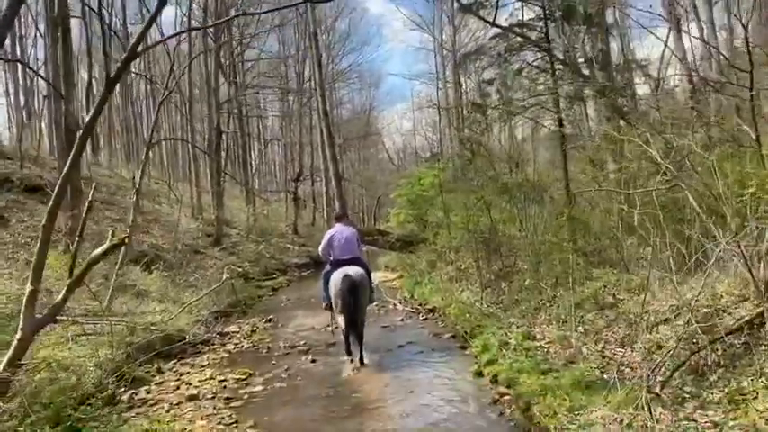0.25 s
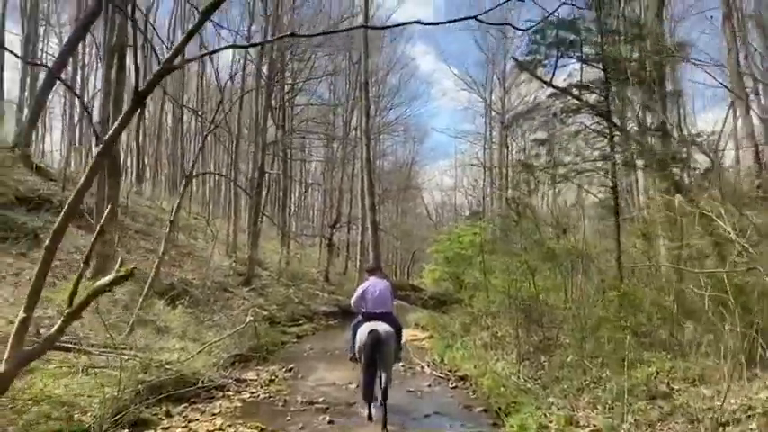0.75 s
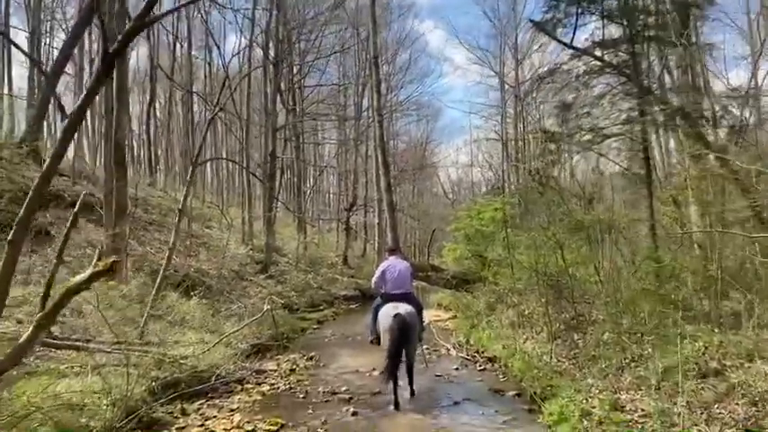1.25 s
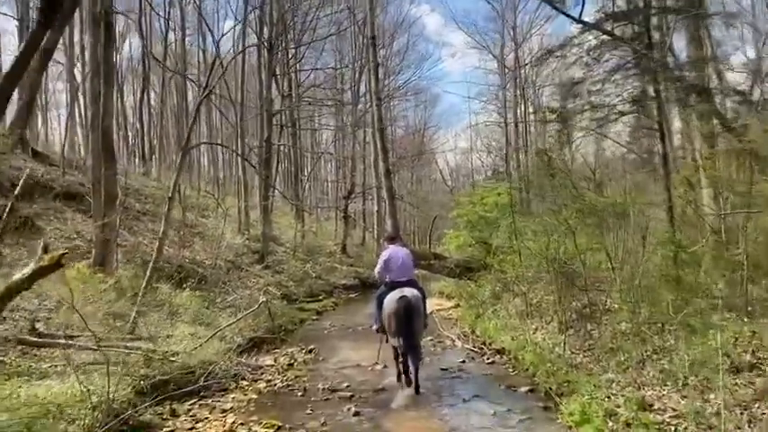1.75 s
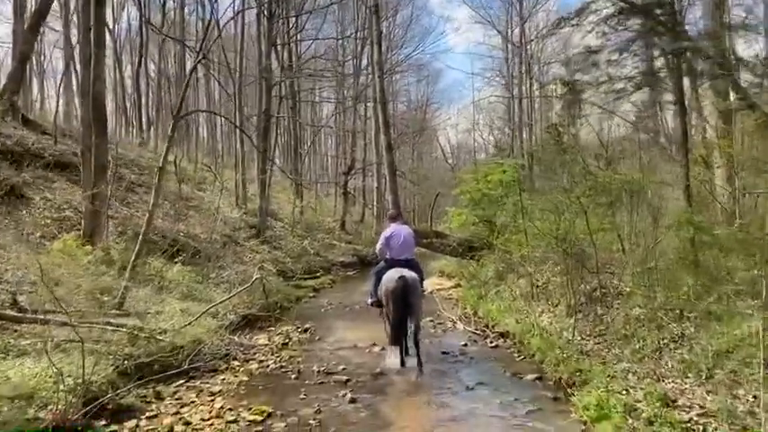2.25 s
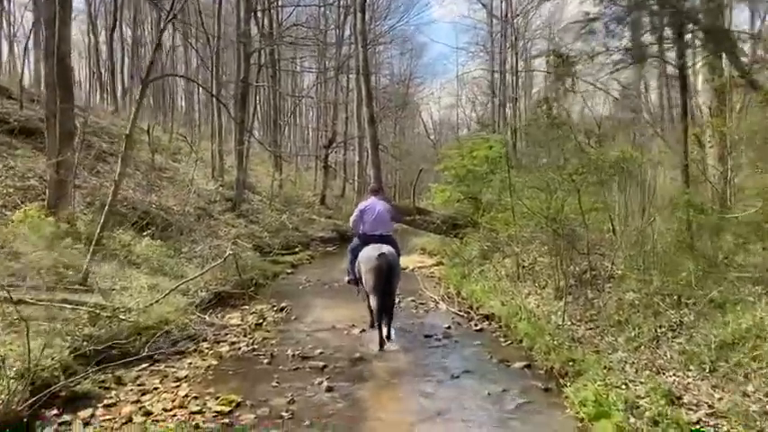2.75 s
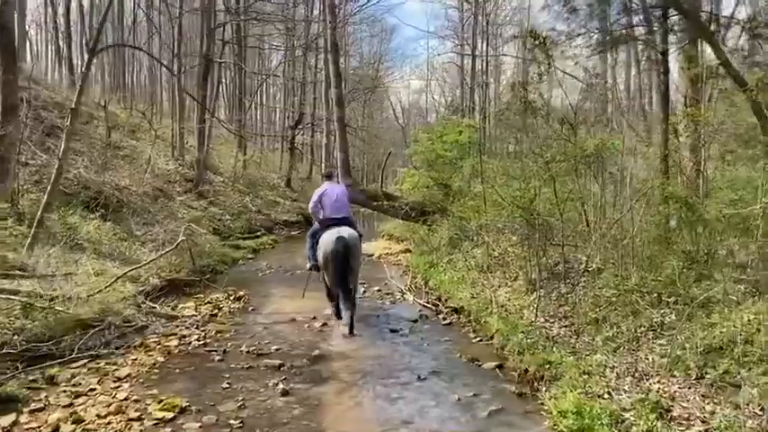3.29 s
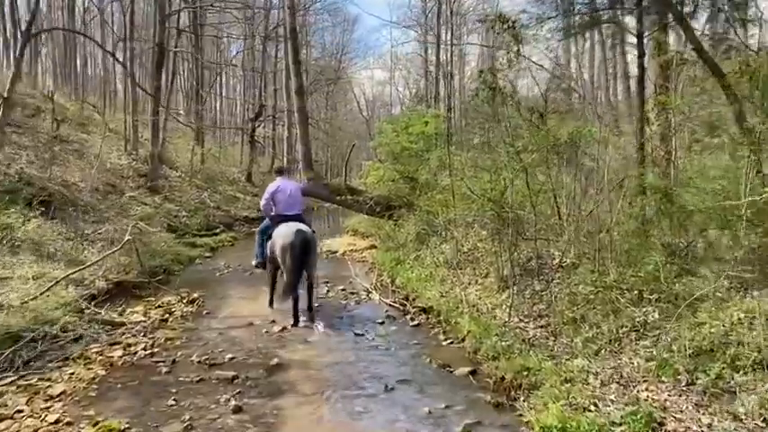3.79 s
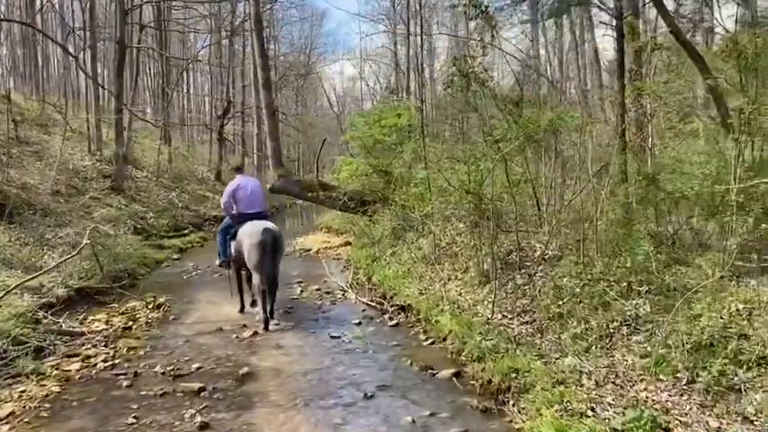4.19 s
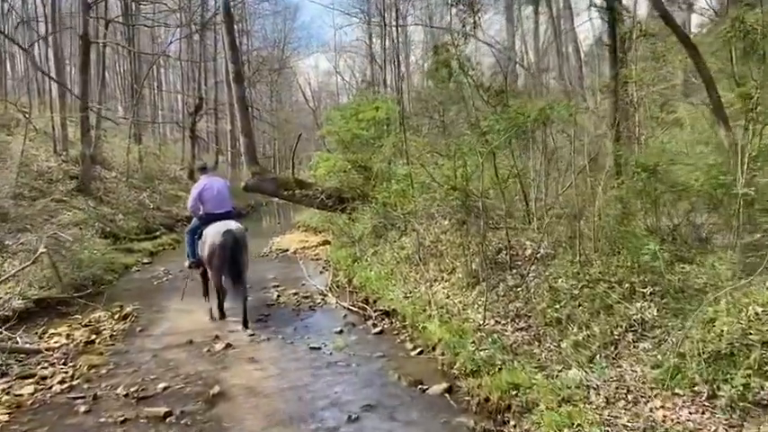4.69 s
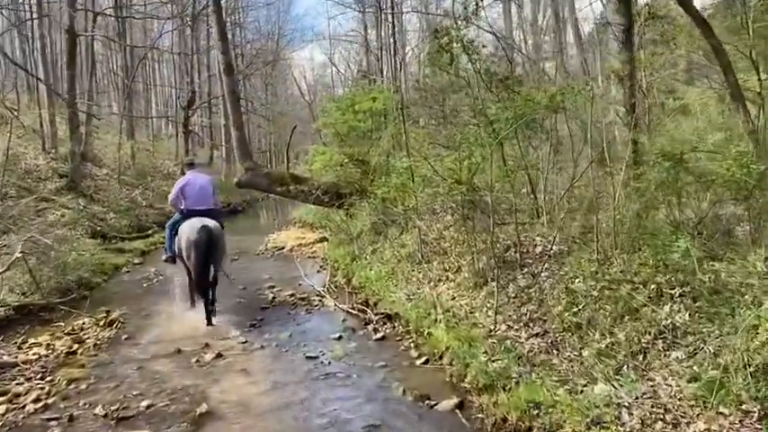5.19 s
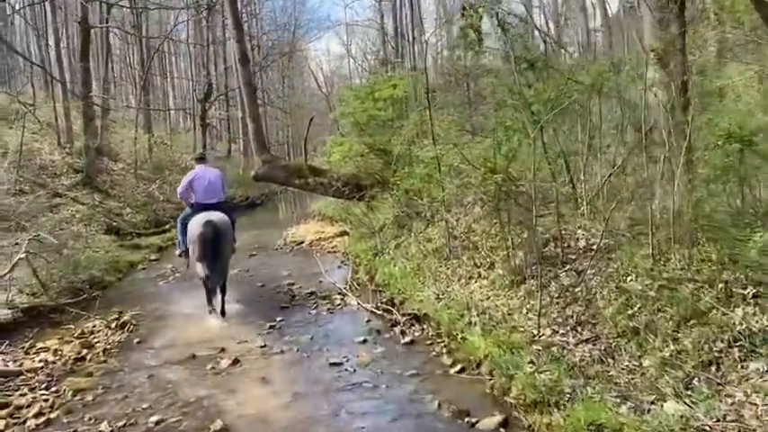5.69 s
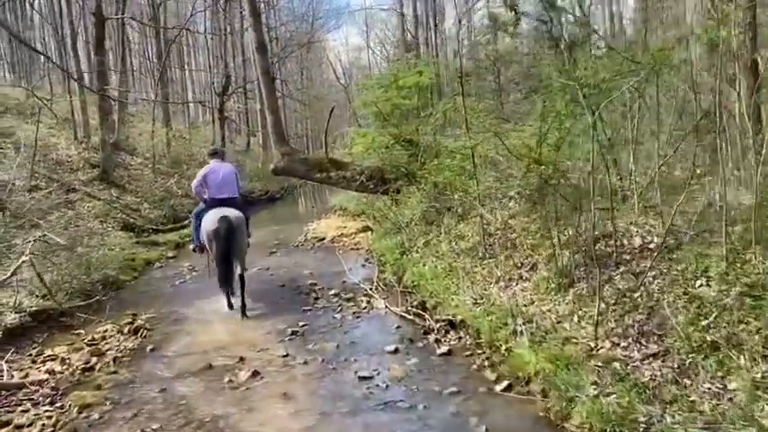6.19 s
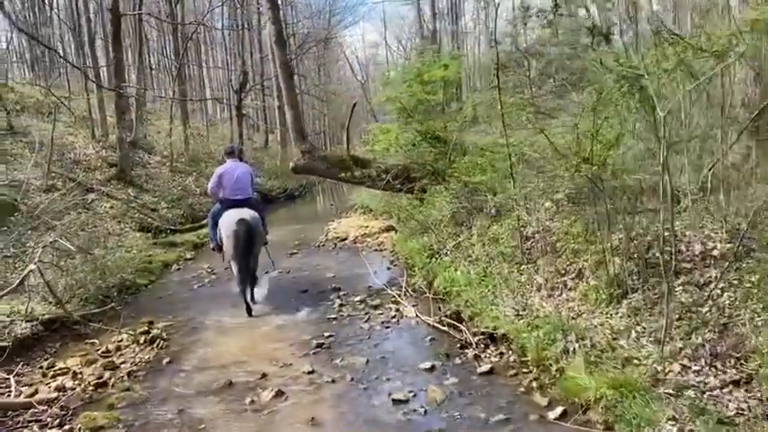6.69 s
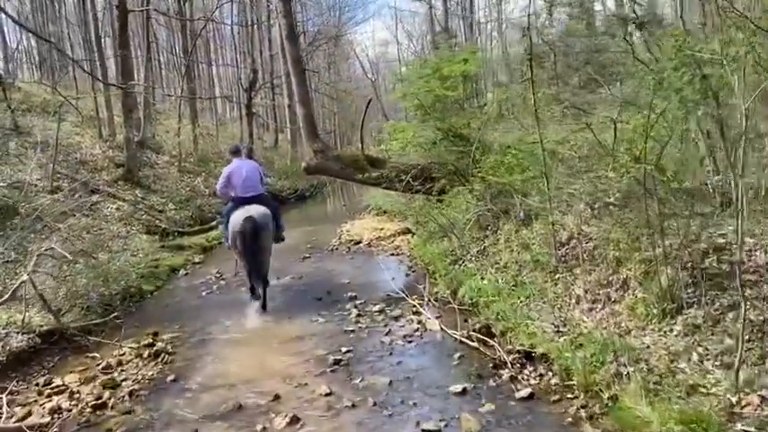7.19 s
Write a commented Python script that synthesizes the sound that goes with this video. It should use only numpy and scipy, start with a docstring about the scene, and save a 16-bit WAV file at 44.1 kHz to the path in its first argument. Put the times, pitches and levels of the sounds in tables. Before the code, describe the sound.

Uneven splashes and hollow hoof knocks on wet stones continue throughout as horses wade along a woodland creek. Each stride churns up bubbling water and crackling spray, mixed with low plunks and sliding gurgles. The stereo microphone rides above one horse, so the steps sound close below, with occasional dull footfall thuds. A faint, even hiss of running water lies behind it all.

```python
"""Hooves plunge and knock stones over as horses walk up a shallow stony creek in open woods.
The stereo microphone rides above one of the horses. Close below it, thrown water slaps down,
trapped air escapes in plunks and sliding gurgles, the stirred water bubbles and spray hisses.
Footfalls thud low, and the even hiss of the running creek lies all around."""
import sys
import numpy as np
from scipy import signal
from scipy.fft import rfft, irfft, next_fast_len
from scipy.io import wavfile
from scipy.ndimage import uniform_filter1d

SR = 44100
rng = np.random.default_rng(int(sys.argv[2]) if len(sys.argv) > 2 else 0)


def wav_out(sig):
    """Save sig, one row per channel (or a flat mono array), as 16-bit PCM at SR to the path in sys.argv[1]."""
    wavfile.write(sys.argv[1], SR, np.round(np.clip(np.atleast_2d(sig).T, -1, 1) * 32767).astype(np.int16))


N = 328545

# legs sweeping through the water, each throwing spray: (peak time [s], level [dB], length [s])
LEG_SWEEPS = [(0.0, -40.5, 0.057), (0.3, -42.5, 0.2), (0.55, -48.5, 0.21), (0.95, -50, 0.45),
              (1.21, -42, 0.071), (1.61, -46.5, 0.54), (1.82, -43.5, 0.044), (1.94, -38.5, 0.023),
              (2.24, -44.5, 0.35), (2.9, -43.5, 0.75), (3.32, -50.5, 0.35), (3.5, -43.5, 0.6),
              (4.19, -39, 0.18), (4.53, -42.5, 0.036), (4.82, -46, 0.64), (5.22, -47.5, 0.24),
              (5.6, -37.5, 0.24), (5.87, -43, 0.12), (6.13, -43.5, 0.35), (6.52, -47.5, 0.21),
              (6.92, -40.5, 0.15), (7.25, -48, 0.85)]
SWEEP_RISE_DB, SWEEP_FALL_DB = 20, 13  # lost one length before and after the peak
DRIP_DB = -76  # dripping between sweeps


def hoof_knocks(gulp_count=6):
    """Each blow on the stones rings two modes and splashes; the hole in the water closes in gulps."""
    # hoof plunges and stone knocks: (time [s], base level [dB], base pitch [Hz], splash level [dB])
    blows = [(0.322, -28, 450, -27), (0.334, -25.5, 384, -37), (0.449, -35, 270, -53),
             (0.496, -34, 477, -34), (0.729, -32.5, 242, -32.5), (0.81, -40.5, 590, -42),
             (0.92, -24, 990, -27), (0.931, -32, 830, -33), (0.943, -23, 707, -30.5),
             (1.054, -29.5, 318, -33), (1.124, -21, 470, -38), (1.199, -30, 1370, -51),
             (1.227, -30.5, 280, -26.5), (1.448, -26.5, 394, -44), (1.546, -36, 540, -26),
             (1.576, -26.5, 1280, -29), (1.585, -21.5, 486, -49), (1.626, -27, 460, -55),
             (1.641, -28.5, 580, -28.5), (1.701, -29.5, 784, -49), (1.801, -27.5, 264, -21.5),
             (1.938, -30.5, 356, -26), (2.231, -24.5, 518, -20), (2.356, -35, 302, -32),
             (2.51, -32.5, 477, -28), (2.855, -24, 925, -52), (2.858, -19, 425, -52),
             (2.897, -17, 670, -26), (3.097, -24, 576, -33), (3.179, -20, 311, -60),
             (3.461, -48, 1010, -25.5), (3.521, -24, 777, -27), (3.53, -18.5, 353, -58),
             (3.668, -28.5, 320, -51), (3.858, -31, 630, -27.5), (4.004, -35.5, 412, -26.5),
             (4.226, -28.5, 446, -20), (4.232, -23, 1260, -49), (4.238, -17, 486, -59),
             (4.273, -28.5, 710, -45), (4.572, -31, 373, -57), (4.606, -24, 395, -41),
             (4.705, -29, 504, -31), (4.747, -31.5, 263, -39), (4.848, -18, 662, -19),
             (4.893, -31, 644, -33), (5.38, -30, 448, -34), (5.565, -17, 497, -20),
             (5.583, -23.5, 746, -43), (5.603, -25.5, 373, -45), (5.667, -28, 663, -28.5),
             (5.868, -30, 905, -25.5), (6.019, -31, 970, -31), (6.152, -31, 503, -33),
             (6.232, -26.5, 820, -53), (6.604, -28.5, 880, -30), (6.662, -31, 258, -34),
             (6.716, -33, 238, -30.5), (6.889, -38, 1580, -37), (6.937, -34, 615, -22.5),
             (7.017, -26.5, 600, -29), (7.048, -27.5, 437, -42), (7.209, -33, 507, -27.5),
             (7.258, -35, 820, -29.5), (7.406, -35, 470, -29.5)]
    # modes of a knock: (pitch factor before detuning, gain [dB], time to fall 60 dB [s])
    modes = [(1.003, 17, 0.024), (1.55, 7.5, 0.021)]
    out, splash, t = np.zeros(N), np.zeros(N), np.arange(6000) / SR
    contact = ring(hz=1080, t60=0.028, glide=-0.57, rise=0.00015, phase=np.pi)  # the hard first touch
    for (s, db, hz, splash_db), draws in zip(blows, rng.random((len(blows), gulp_count, 3))):
        for (factor, mode_db, t60), detune in zip(modes, draws[:, 0]):
            mode_hz = hz * factor ** (0.58 + 0.63 * detune)
            mode = ring(mode_hz, t60, glide=-0.075, rise=0.0013, phase=np.pi, order=2)
            add(out, s, gain_of(db + mode_db) * mode)
        add(out, s, gain_of(db - 1.5) * contact)
        for when, pitch, softness in draws:  # later gulps are lower and fainter
            delay = 0.00892 + 0.05 * when
            gulp_hz = hz * 2 ** (.9 * pitch - .3 - 9 * delay)
            gulp = ring(gulp_hz, t60=19 / gulp_hz, glide=0.081, rise=0.23 / gulp_hz)
            add(out, s + delay, gain_of(db + 4.5 - 410 * delay - 2.3 * softness) * gulp)
        add(splash, s, gain_of(splash_db - 60 * t / 0.16) * (1 - np.exp(-t / 0.0012)))
    return out + splash * froth()


def plunks():
    """A hoof sinks into a pool: a large air pocket rings low, its pitch rising as it nears the surface."""
    # deep air pockets: (time [s], peak level [dB], pitch [Hz])
    pockets = [(0.214, -25, 198), (0.594, -26, 179), (1.116, -18.5, 185), (1.139, -19.5, 157),
               (2.025, -27.5, 205), (2.246, -23, 146), (2.363, -26.5, 206), (2.511, -22, 159),
               (3.86, -25, 156), (4.71, -23.5, 176), (5.138, -28, 187), (5.768, -27.5, 200),
               (5.827, -26.5, 179), (6.463, -28.5, 193), (7.352, -22.5, 201.4)]
    out = np.zeros(N)
    for s, db, hz in pockets:
        pocket = ring(hz, t60=0.074, glide=0.041, rise=0.0012)
        add(out, s, gain_of(db) * pocket / abs(pocket).max())
    return out


def slaps(drop_count=4):
    """A sheet of water lands: a burst of pitched hiss that dies fast, and a few drops that ring."""
    # thrown water landing: (time [s], level [dB], band centre [Hz])
    sheets = [(0.2217, -25, 2350), (0.3424, -24, 2400), (1.185, -30, 2380), (1.212, -30.5, 4230),
              (1.612, -24.5, 4150), (1.678, -30.5, 3250), (1.924, -24, 2340), (2.2433, -25.5, 3440),
              (2.309, -34, 3700), (2.6033, -28, 2580), (2.815, -25.5, 3130), (3.342, -28, 2940),
              (3.393, -31, 4660), (3.464, -26, 2230), (3.6925, -34, 4100), (4.004, -22, 2590),
              (4.3813, -31.5, 6260), (4.627, -33, 2450), (4.7077, -25.5, 4070), (4.8153, -28.5, 5000),
              (5.3195, -29.5, 3260), (5.371, -27, 3120), (5.413, -33, 4500), (5.5718, -21, 2700),
              (5.887, -28.5, 2700)]
    width, t60, rise = 1.54, 0.036, 0.0019  # band edge over centre, decay [s], onset [s]
    out, t = np.zeros(N), np.arange(4000) / SR
    envelope = gain_of(-60 * t / t60) * (1 - np.exp(-t / rise))
    noises = rng.standard_normal((len(sheets), len(t)))
    for (s, db, hz), noise, draws in zip(sheets, noises, rng.random((len(sheets), drop_count, 2))):
        band = signal.lfilter(*signal.butter(2, [hz / width, hz * width], "band", fs=SR), noise)
        fine_hiss = gain_of(-6.5) * np.gradient(noise)
        add(out, s, gain_of(db) * envelope * (unit_rms(band) + fine_hiss))
        for when, pitch in draws:
            drop = ring(hz * width ** (pitch - .5), t60 / 2, glide=0.14, rise=0.0005)
            add(out, s + 0.025 * when ** 2, gain_of(db - 7.5) * drop)
    return out


def escaping_air():
    """Air leaves the hole a hoof makes: a husky, sliding tone inside a swell of froth."""
    # sliding gurgles: (time [s], length [s], start pitch [Hz], end pitch [Hz], level [dB])
    slides = [(0.398, 0.038, 345, 300, -33.5), (0.945, 0.063, 490, 395, -27.5),
              (1.199, 0.069, 1358, 1068, -29), (2.186, 0.044, 1194, 990, -30.5),
              (2.606, 0.043, 1770, 1860, -32), (3.27, 0.096, 247, 358, -30), (3.467, 0.0594, 790, 590, -26),
              (3.659, 0.097, 290.5, 558, -32.5), (4.186, 0.042, 502, 990, -28.5),
              (4.433, 0.067, 326, 390, -32.5), (4.619, 0.047, 305, 437, -35),
              (5.241, 0.069, 202, 257, -25.5), (5.916, 0.06, 616, 490, -36),
              (6.325, 0.062, 1000, 1017, -39), (6.335, 0.053, 433, 498, -33.5),
              (6.505, 0.092, 1004, 835, -34), (6.51, 0.052, 195, 236, -31.5),
              (6.692, 0.0375, 1517, 1940, -34), (7.064, 0.09, 509, 807, -37.5)]
    out, swell = np.zeros(N), np.zeros(N)
    for (s, length, from_hz, to_hz, db), wobble in zip(slides, rng.standard_normal((len(slides), 2, 400))):
        turns = np.cumsum(np.linspace(from_hz, to_hz, int(length * SR))) / SR
        # strength and phase wobble every 1.8 cycles
        strength, slip = (np.interp(turns / 1.8, np.arange(len(w)), w) for w in wobble)
        envelope = gain_of(db) * signal.windows.tukey(len(turns), .5)
        add(out, s, envelope * (1 + 0.72 * strength) * np.sin(2 * np.pi * turns + 0.99 * slip))
        add(swell, s, gain_of(-9.5) * envelope)
    return out + swell * froth()


def froth():
    """The dense crackle of small bubbles in broken water."""
    sizes = [(450, 6.5), (1200, 7.0), (1550, 0.5), (2200, 2.5), (5000, -14)]  # (pitch [Hz], level [dB])
    return bubbles(sizes, cycles=36.4, density=1.6, spread_db=3.0, glide=0.12, count=16)


def gurgle():
    """Large bubbles under the hooves ring and rise in pitch over a slosh, swelling with each sweep."""
    # large bubbles: (pitch [Hz], relative level [dB])
    sizes = [(120, -4.5), (300, -3), (500, -5), (1100, -3), (1500, -9.5), (2200, -11)]
    # slow course of the churning: (time [s], level [dB])
    churn = [(0.0, -36), (2.6, -43), (5.5, -38.5), (7.45, -38.5)]
    ringing = bubbles(sizes, cycles=21.2, density=.9, spread_db=3.5, glide=0.2, count=24)
    slosh = gain_of(-1.5) * coloured_noise(per_hz(sizes))
    level = gain_of(np.interp(np.arange(N) / SR, *np.transpose(churn)))
    stirred = unit_rms(swells(LEG_SWEEPS, SWEEP_RISE_DB, SWEEP_FALL_DB, DRIP_DB) ** 0.27)
    return level * stirred * surges(depth_db=5.5, seconds=0.042) * (ringing + slosh)


def spray():
    """Droplets thrown by the legs crackle on the surface over a finer hiss."""
    # droplets: (pitch [Hz], relative level [dB])
    sizes = [(1500, -3), (2200, -0.5), (4000, -0.5), (7000, -5.5), (11000, -5), (15500, -7.5)]
    drops = bubbles(sizes, cycles=57, density=.4, spread_db=3.5, glide=0.073, count=28)
    thrown = swells(LEG_SWEEPS, SWEEP_RISE_DB, SWEEP_FALL_DB, DRIP_DB)
    flutter = surges(depth_db=3.5, seconds=0.024)
    hiss = coloured_noise(per_hz(sizes))
    return thrown * flutter * (gain_of(-3) * drops + gain_of(1.5) * hiss)


def thuds():
    """Footfalls and moving air shake the microphone, lower in pitch than the water."""
    # heavy footfalls: (peak time [s], level [dB])
    footfalls = [(1.41, -37), (2.41, -30), (4.69, -40), (5.078, -33), (5.28, -37), (5.44, -25.5),
                 (5.58, -28), (7.1, -37.5)]
    # rumble: (frequency [Hz], relative level [dB])
    spectrum = [(20, -7), (40, -11), (58, 3.5), (100, -1.0), (150, -8.5), (300, -43.5)]
    shake = swells([(s, db, 0.059) for s, db in footfalls], rise_db=8, fall_db=13.5, rest_db=-45)
    return shake * surges(depth_db=3.5, seconds=0.021) * coloured_noise(spectrum)


def bank_scatter(near):
    """Stones and banks scatter the close sounds, so their phases drift over time and pitch."""
    spectra = signal.stft(near, SR, nperseg=1024)[2]
    drift = rng.standard_normal(spectra.shape[::-1]).T
    drift = unit_rms(uniform_filter1d(uniform_filter1d(drift, size=8, axis=0), size=4, axis=1))
    return gain_of(-2) * signal.istft(spectra * np.exp(2j * drift), SR, nperseg=1024)[1][:N]


def creek():
    """The running creek hisses evenly behind the horses."""
    # running water: (frequency [Hz], relative level [dB])
    spectrum = [(40, -27), (200, -3), (600, 8), (1500, 5), (8000, -8.5), (16000, -11)]
    return gain_of(-51.5) * coloured_noise(spectrum)


def surroundings():
    """Everything that reaches the microphone from all around, new on each call."""
    return gurgle() + spray() + thuds() + creek()


def microphone(common, differing):
    """Both sides hear the common sound; a share of the differing one adds left and subtracts right."""
    # likeness of the two sides: (frequency [Hz], correlation [0-1])
    likeness = [(60, 0.92), (300, 0.93), (700, 0.55), (1400, 0.074), (3000, 0.32), (6000, 0.33), (8000, 1)]
    # phase between the sides: (frequency [Hz], left lead [rad])
    lead = [(0, 0), (1100, .4), (3500, .5), (7100, 0), (15200, -12.5)]
    # balance: (frequency [Hz], left over right [dB])
    lean = [(60, 0), (300, 0), (700, 1.5), (1300, -2), (4400, 1.5), (8000, -0.5)]
    hz, _, (mid, spread) = signal.stft([common, differing], SR, nperseg=1024)
    alike = np.clip(curve_at(likeness, hz), 0, 1)[:, None]
    side = np.array([.5, -.5])[:, None, None]
    spectra = np.sqrt((1 + alike) / 2) * mid + side * np.sqrt(2 * (1 - alike)) * spread
    phase = np.exp(1j * side * np.interp(hz, *np.transpose(lead))[:, None])
    balance = gain_of(side * curve_at(lean, hz)[:, None])
    return signal.istft(spectra * phase * balance, SR, nperseg=1024)[1][:, :N]


def ring(hz, t60, glide, rise, phase=0, order=1):
    """A soft-edged tone that falls 60 dB in t60 seconds while its pitch moves by the fraction glide."""
    t = np.arange(int(t60 * SR) + 8) / SR
    turns = hz * (t + .5 * glide * t ** 2 / t60)
    return (1 - np.exp(-t / rise)) ** order * gain_of(-60 * t / t60) * np.sin(2 * np.pi * turns + phase)


def bubbles(sizes, cycles, density, spread_db, glide, count):
    """Air pockets of count sizes ring at random, each density * sqrt(pitch) times a second."""
    out = np.zeros(N)
    for hz in np.geomspace(sizes[0][0], sizes[-1][0], count):
        when, chance, sign = rng.random((int(density * np.sqrt(hz) * N / SR), 3)).T
        strength = gain_of(spread_db * np.minimum(-np.log(chance + 1e-9), 5))  # a few stand out
        train = np.zeros(N)
        train[(when * N).astype(int)] = strength * np.sign(sign - .5)
        pocket = ring(hz, cycles / hz, glide * rng.uniform(0, 2.73), rise=0.5 / hz)
        out += gain_of(curve_at(sizes, hz)) * unit_rms(signal.oaconvolve(train, pocket)[:N])
    return unit_rms(out)


def swells(rows, rise_db, fall_db, rest_db):
    """Gain of swells (peak time [s], level [dB], length [s]) over a resting level; their powers add."""
    t = np.arange(0, N, 64) / SR
    power = gain_of(rest_db) ** 2
    for s, db, length in rows:
        power += gain_of(db - np.where(t < s, rise_db, fall_db) * abs(t - s) / length) ** 2
    return np.interp(np.arange(N) / SR, t, np.sqrt(power))


def surges(depth_db, seconds):
    """Water moves in lumps: a random gain that changes within the given time."""
    span = int(seconds * SR)
    lumps = unit_rms(uniform_filter1d(uniform_filter1d(rng.standard_normal(N), span), span))
    return unit_rms(gain_of(depth_db * 2 * np.tanh(lumps / 2)))


def coloured_noise(spectrum):
    """Noise of rms 1 shaped by (frequency [Hz], level [dB]) points."""
    size = next_fast_len(N)
    gains = gain_of(curve_at(spectrum, np.fft.rfftfreq(size, 1 / SR)))
    return unit_rms(irfft(rfft(rng.standard_normal(size)) * gains, size)[:N])


def per_hz(sizes):
    """Turns levels per bubble size into a noise spectrum closed at both ends."""
    inner = [(hz, db - 10 * np.log10(hz)) for hz, db in sizes]
    return [(.6 * sizes[0][0], -70)] + inner + [(1.6 * sizes[-1][0], -70)]


def curve_at(points, hz):
    """Reads a curve on a log frequency axis."""
    point_hz, values = np.transpose(points)
    return np.interp(np.log(hz + 1), np.log(point_hz + 1), values)


def gain_of(db):
    """Decibels to a factor."""
    return 10 ** (np.asarray(db) / 20)


def unit_rms(x):
    """Scales to rms 1."""
    return x / np.sqrt(np.mean(x ** 2) + 1e-20)


def add(mix, s, sound):
    """Mixes a sound in at s seconds."""
    part = mix[max(round(s * SR), 0):][:len(sound)]
    part += sound[:len(part)]


def scene():
    """From horseback: hooves close below, their scatter off the banks, and water all around."""
    near = hoof_knocks() + plunks() + slaps() + escaping_air()
    return microphone(near + surroundings(), bank_scatter(near) + surroundings())


def record(dry):
    """The recorder cuts the treble above 15.9 kHz."""
    lowpass = signal.firwin(511, 15900, window=("kaiser", 9), fs=SR)
    return signal.oaconvolve(dry, lowpass[None], "same")


dry = scene()
out = record(dry)
wav_out(out)
```